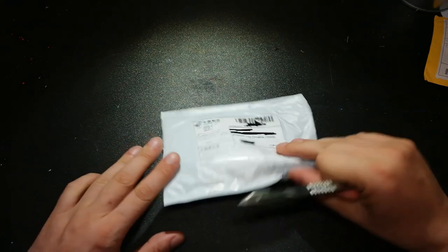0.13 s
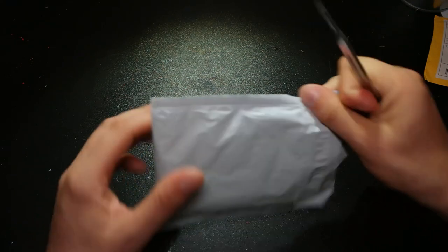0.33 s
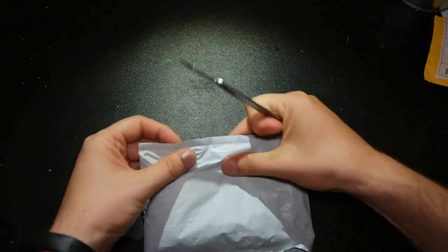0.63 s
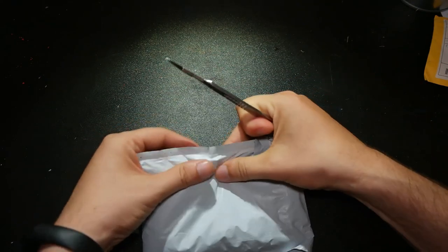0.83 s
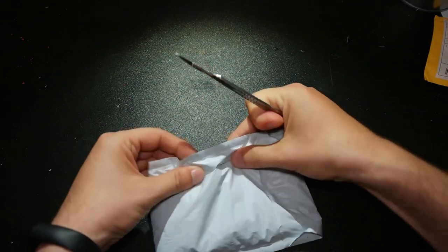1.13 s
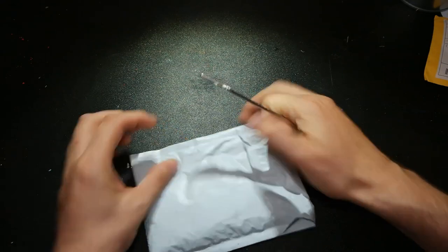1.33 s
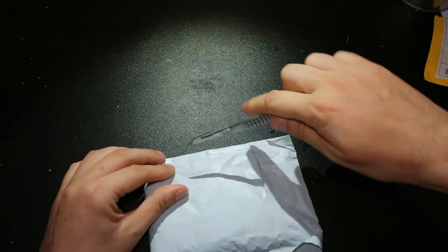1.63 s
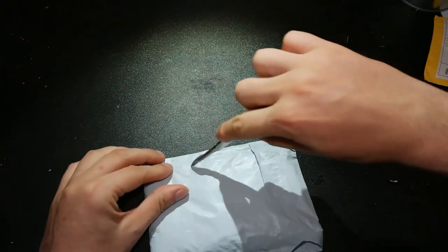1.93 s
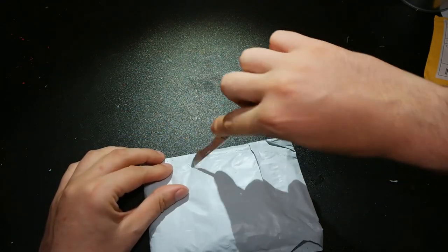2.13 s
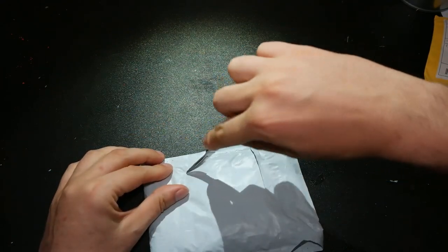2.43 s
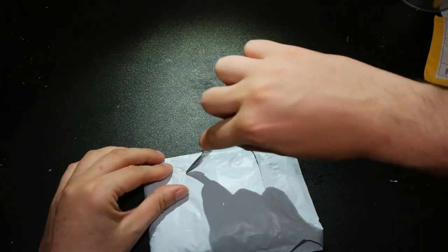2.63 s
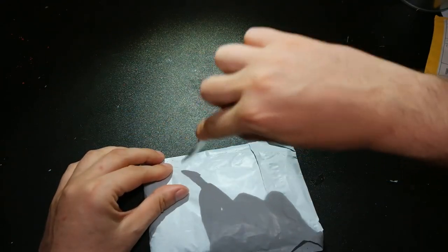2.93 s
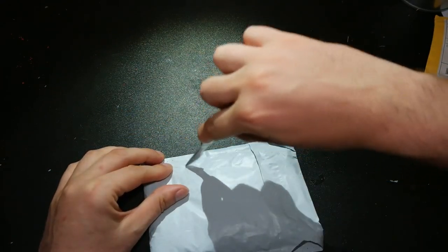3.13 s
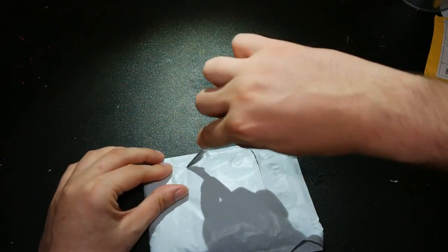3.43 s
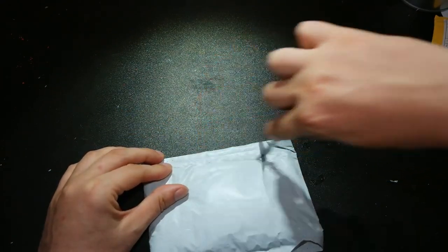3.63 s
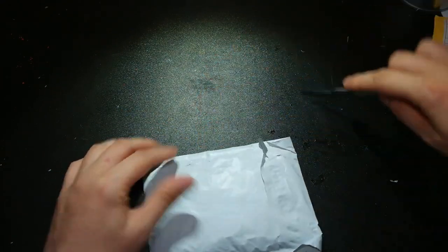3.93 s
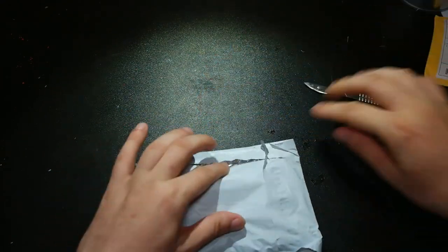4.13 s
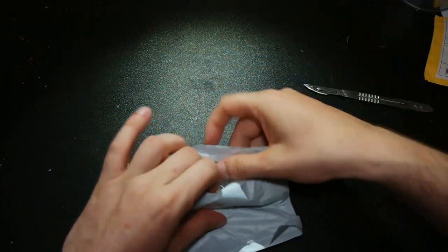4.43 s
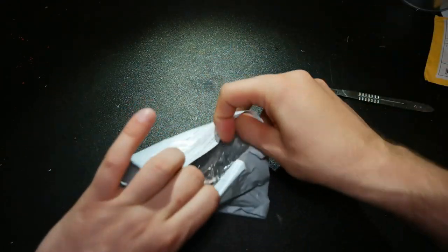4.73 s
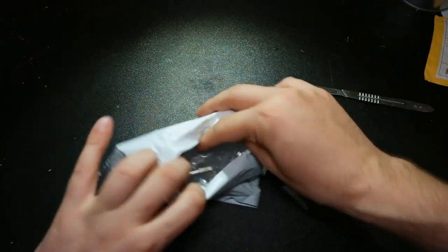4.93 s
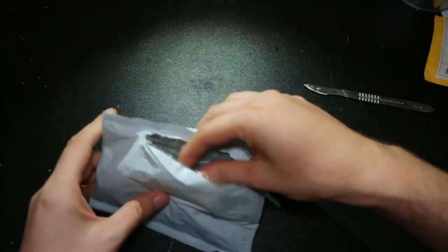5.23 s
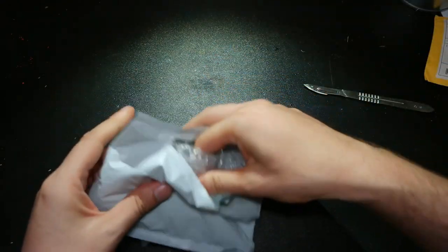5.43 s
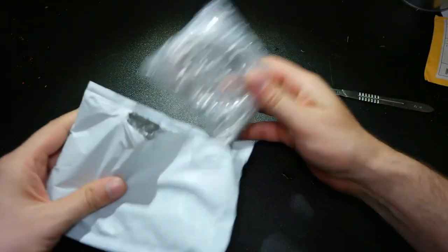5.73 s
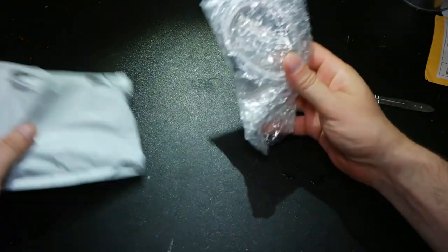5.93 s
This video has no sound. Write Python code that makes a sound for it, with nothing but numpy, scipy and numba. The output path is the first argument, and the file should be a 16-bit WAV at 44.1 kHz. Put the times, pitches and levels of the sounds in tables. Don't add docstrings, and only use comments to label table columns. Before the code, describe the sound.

Close, bright crinkling of a plastic mailer, a quiet pause of small cutting clicks, a steel blade dropped on the desk, then tearing and more crinkling.

```python
import sys
import numpy as np
from scipy import signal
from scipy.fft import rfft, irfft, next_fast_len
from scipy.io import wavfile
from scipy.ndimage import map_coordinates
from numba import njit

SR = 44100
rng = np.random.default_rng(int(sys.argv[2]) if len(sys.argv) > 2 else 0)


def makeup_ratio(level_db):
    decades = np.asarray(level_db, float) / 20
    return 10 ** decades


def to_wav(sig):
    pcm = np.clip(np.atleast_2d(sig), -1, 1) * 32767
    pcm = np.round(pcm).astype(np.int16)
    wavfile.write(sys.argv[1], SR, pcm.T)


N = 267907

# (start [s], hold [s], film level [dB], weight on bag and desk re film [dB], air pocket pitch [Hz])
HAND_MOVES = [(0.045, 0.087, -28.5, -8.5, 1550), (0.171, 0.054, -22.5, -10.5, 1390),
              (0.325, 0.046, -34, -13.5, 1750), (0.429, 0.022, -31, -15, 1590),
              (0.5, 0.0097, -23.5, -7, 1170), (0.582, 0.02, -29.5, 1, 1070),
              (0.625, 0.05, -27, -8, 1270), (0.728, 0.0078, -22, -13.5, 1050),
              (0.807, 0.048, -32.5, -5, 1070), (0.918, 0.069, -20.5, -14, 1140),
              (0.997, 0.056, -26, 0.5, 1050), (1.121, 0.086, -22.5, -12.5, 1310),
              (1.303, 0.017, -19.5, -9, 1320), (1.362, 0.05, -30.5, -9, 1100),
              (1.55, 0.05, -42.5, -7.5, 1400),
              (1.98, 0.016, -55.5, -4, 1300), (2.041, 0.018, -59, -12, 1410),
                 (2.199, 0.011, -57, -12, 1000), (2.471, 0.037, -51, -4, 1730),
                 (2.745, 0.018, -54, -25, 2200), (2.785, 0.082, -55, -25, 1920),
                 (2.974, 0.0086, -36, -11, 1930), (3.19, 0.0086, -54, 8.5, 1360),
                 (3.3, 0.018, -88, 10, 633), (3.492, .04, -45.5, -38, 1300),
                 (3.541, 0.053, -24, -8.5, 1050), (3.6, 0.1, -20.5, -5, 1400),
                 (3.74, 0.029, -27, -11.5, 1160), (3.898, 0.063, -36.5, -6, 770),
                 (3.995, 0.033, -45, 25.5, 660), (4.08, 0.066, -36, 10, 935),
                 (4.149, 0.083, -35.5, 13, 773),
              (4.286, 0.0083, -30, -8, 1130), (4.371, 0.016, -24, -8, 950),
                   (4.463, 0.035, -31, -5, 1240), (4.574, 0.022, -18, -9, 1300),
                   (4.655, 0.042, -23.5, -13.5, 1510), (4.734, 0.071, -25, -15.5, 1300),
                   (4.899, 0.0068, -40, -9, 1080), (4.996, 0.072, -24.5, -7.5, 1200),
                   (5.256, 0.063, -25.5, -11.5, 1600), (5.33, .03, -42, -7, 1050),
                   (5.365, 0.1, -34.5, -24, 1780), (5.468, 0.089, -32.5, -18, 2150),
                   (5.603, 0.11, -25.5, -16.5, 1570), (5.719, 0.073, -32, -7.5, 890)]
# (time [s], level [dB])
FILM_CREEP = [(0, -35.5), (.12, -39.5), (1.4, -54), (1.52, -48), (1.82, -60), (2.4, -70.5), (3.45, -68),
              (3.9, -60.5), (4.3, -39), (4.6, -26.5), (5.1, -34), (5.16, -38.5), (5.75, -38), (5.93, -40.5),
              (6.07, -41.5)]
FILM_BANDS = [140, 700, 3600, 11500]
# (start [s], length [s], level [dB], first pitch [Hz], last pitch [Hz])
SINGING_PANELS = [(0.012, 0.041, -32.5, 1570, 1512), (2.358, 0.00297, -56, 2060, 2000),
                  (2.467, .012, -45, 2000, 2000), (0.17, 0.012, -31.5, 1380, 1460),
                  (0.492, .022, -37.5, 1000, 1013), (0.658, .02, -40.5, 1206, 1246),
                  (0.934, 0.031, -28.5, 1033, 1013), (1.024, 0.031, -34.5, 1006, 1030),
                  (1.349, .035, -30.5, 1155, 1140), (3.59, 0.028, -28, 1113, 1740),
                  (3.64, 0.015, -28.5, 1340, 1300), (3.649, 0.017, -31, 1300, 1830),
                  (3.68, .02, -36.5, 1270, 1130), (4.911, 0.004, -32.5, 1050, 1010),
                  (4.584, 0.039, -29, 1430, 2000), (4.771, 0.024, -36, 1060, 1125),
                  (5.33, 0.09, -42, 1050, 1030), (5.346, .035, -32, 2450, 1590),
                  (5.465, 0.092, -34.5, 2140, 2220), (5.506, .04, -32.5, 3880, 3840),
                  (5.613, 0.062, -35.5, 1570, 1540), (5.749, 0.054, -41.5, 800, 815)]
# (time [s], peak level [dB], fine creases re peak
# [dB], flap pitch [Hz])
FOLD_SNAPS = [(0.157, -21, -16, 4750), (0.177, -7.5, -12.5, 1370), (0.2333, -17.5, -1.5, 1010),
              (0.2529, -8.5, -14, 3350), (0.3431, -17.5, -2.5, 1860), (0.367, -17.5, -11.5, 1860),
              (0.4372, -16, -17.5, 1760), (0.4998, -17, -1, 1070), (0.511, -17, 6, 1020),
              (0.601, -15.5, -26.5, 4700), (0.651, -16, -11, 1430), (0.7199, -17, 7.5, 3020),
              (0.733, -15.5, -4, 7160), (0.7495, -17, -2.5, 940), (0.832, -24.5, 8, 4030),
              (0.914, -22.5, 6, 6440), (0.9386, -16, 3, 1070), (0.969, -22, -5, 3770),
              (0.999, -22, 8, 6750), (1.0282, -8, -28, 850), (1.1085, -18, -11, 2760),
              (1.127, -16, -2, 3120), (1.137, -20.5, 6, 5000), (1.146, -19.5, 13, 4530),
              (1.182, -20, -3, 4770), (1.2995, -25.5, 10, 3060), (1.4013, -26, -10, 3480),
              (1.4322, -20, -4, 1487), (1.477, -32, 3, 5600),
              (1.5913, -24, -10.5, 1390), (1.7014, -34, -2, 5430), (1.7828, -43.5, -19, 2480),
                 (1.984, -59.5, 17, 5060), (2.0506, -40, -3, 3670), (2.3578, -37.5, -26, 2070),
                 (2.4667, -30.5, -1, 3100), (2.505, -35, -3, 2750), (2.776, -22, -0.5, 4940),
                 (2.809, -24, -7.5, 1960), (2.83, -21, -8.5, 3960), (2.953, -35, -30.5, 4760),
                 (2.9699, -17.5, 5.5, 2060), (2.9722, -9.5, 1, 1980), (2.9799, -38, 4, 3830),
                 (3.193, -28, -23, 1940), (3.2068, -38, 7.5, 3000), (3.303, -48, -27, 1005),
                 (3.479, -30, -9, 3440), (3.488, -33, 7, 2430), (3.528, -32, 9, 3300),
                 (3.561, -26, 5, 3920), (3.589, -23, -7, 1070), (3.6247, -7, -1, 6570),
                 (3.7372, -9.5, -1, 1100), (3.792, -15.5, 3.5, 1580), (3.911, -17.5, 3, 2420),
                 (3.9916, -10.5, -3.5, 1030), (4.0752, -4.5, -12, 750), (4.1468, -20, -22, 796),
                 (4.228, -33, 22.5, 977),
              (4.3003, -21.5, 9.5, 5100), (4.365, -20.5, -1, 1080), (4.4585, -25, -3, 1020),
                   (4.4798, -19.5, -0.5, 1640), (4.5208, -18.5, -1.5, 5030), (4.572, -8, -24, 1360),
                   (4.657, -23, 3.5, 3200), (4.6695, -15.5, -20, 4100), (4.7297, -32, -17, 3770),
                   (4.756, -37, 5, 6200), (4.796, -13.5, -27, 4300), (4.854, -31, 11, 5800),
                   (4.9091, -11, -4.5, 1070), (5.009, -31, 15.5, 4770), (5.0452, -18, 5, 3350),
                   (5.0721, -14.5, 7.5, 3250), (5.1925, -25.5, -2, 5000), (5.2738, -20, 15, 4780),
                   (5.291, -18, 5.5, 3720), (5.34, -21, 1, 1100), (5.3651, -19, -41, 1820),
                   (5.422, -18.5, 7.5, 6000), (5.4708, -25, 3, 2180), (5.556, -17, -30, 7200),
                   (5.5918, -20.5, -27, 1590), (5.6259, -21, 8, 4840), (5.7206, -18.5, -3.5, 3430),
                   (5.8546, -34, 1.5, 3980), (5.9618, -32, -15, 6530)]
# (time [s], peak level [dB],
# strongest pitch [Hz])
CREASE_TICKS = [(0.0174, -25, 1564), (0.2541, -7.5, 2170), (1.2876, -22, 7200), (1.3086, -7, 5710),
                (0.0648, -27.5, 3000), (0.094, -17, 3000), (0.1176, -21.5, 3220), (0.158, -25, 4750),
                (0.1774, -14.5, 3980), (0.1885, -13, 3130), (0.2334, -19, 13840), (0.2549, -3, 3830),
                (0.3167, -30, 2250), (0.341, -23.5, 11600), (0.366, -29.5, 2210), (0.442, -15.5, 3220),
                (0.4873, -17, 1900), (0.498, -14, 11800), (0.518, -10, 4690), (0.538, -14, 3140),
                (0.5975, -15.5, 3210), (0.617, -13.5, 4570), (0.6475, -23.5, 3210), (0.7063, -16.5, 2960),
                (0.7197, -10.5, 12500), (0.733, -16.5, 7220), (0.7505, -5.5, 7150), (0.833, -21, 8700),
                (0.8534, -22.5, 4900), (0.9009, -22.5, 3140), (0.9138, -24, 6360), (0.92, -12.5, 14000),
                (0.94, -13.5, 12300), (0.9493, -11, 3890), (0.97, -12, 3900), (0.9857, -9.5, 13140),
                (0.998, -16.5, 8930), (1.0325, -17, 2990), (1.107, -15.5, 2740), (1.1297, -9.5, 4590),
                (1.134, -8, 12800), (1.145, -3, 13900), (1.156, -6.5, 11880), (1.1844, -5.5, 4720),
                (1.2989, -30.5, 1830), (1.2987, -6, 13300), (1.4032, -24, 3480), (1.429, -25, 3950),
                (1.485, -33, 5510), (1.5459, -37, 2500), (1.558, -35, 5820), (1.5744, -28, 3110),
                 (1.5913, -33, 5280), (1.7005, -25, 4980), (2.359, -37.5, 2030), (2.4665, -32, 3100),
                 (2.4755, -26, 2000), (3.488, -24, 5970), (3.739, -14.5, 5000), (4.0755, -3, 1900),
                 (2.7743, -24.5, 4800), (2.972, -3.5, 8900), (3.5139, -25.5, 13000), (3.5414, -24.5, 3280),
                 (3.5916, -13, 2040), (3.6064, -18.5, 2050), (3.6246, -12, 6450), (3.6407, -14, 2030),
                 (3.6546, -9.5, 3900), (3.6669, -15.5, 1910), (3.6809, -8.5, 4870), (3.6968, -1, 6020),
                 (3.7084, -12.5, 5500), (3.7664, -28, 2940), (3.9579, -30, 11100), (4.2298, -12, 11600),
                (4.3019, -16, 11700), (4.3688, -15.5, 10600), (4.3808, -4, 12200), (4.4563, -32, 3070),
                   (4.4764, -17.5, 13900), (4.5172, -8, 4840), (4.5725, -18.5, 3320), (4.595, -3.5, 10700),
                   (4.611, -2.5, 1800), (4.654, -22, 3280), (4.6664, -5, 3950), (4.6857, -16, 2920),
                   (4.7184, -16.5, 6430), (4.7325, -16, 3980), (4.7548, -20, 11000), (4.7763, -5.5, 14000),
                   (4.7962, -13, 4680), (4.832, -32, 5050), (4.8545, -7, 13600), (4.9109, -4, 7140),
                   (4.9593, -28, 4150), (5.007, -15.5, 10900), (5.0463, -17, 3690), (5.0704, -13.5, 3300),
                   (5.1925, -35.5, 4500), (5.224, -17.5, 3900), (5.2734, -15.5, 10700),
                   (5.2904, -10.5, 13100), (5.3385, -23.5, 5720), (5.3724, -27, 1800), (5.3984, -20, 12100),
                   (5.4198, -15.5, 10800), (5.469, -17, 12800), (5.546, -18, 3900), (5.5643, -9.5, 12000),
                   (5.596, -20.5, 12400), (5.625, -6.5, 11700), (5.672, -13.5, 4900), (5.7181, -31, 3440),
                   (5.8446, -28, 3810)]
# (time [s], desk blow [dB], steel ring re blow [dB], push length [ms])
BLADE_DROPS = [(2.9705, -50.5, 42, 2.1), (3.988, -12.5, -1, 2.1), (4.02, -19, -10, 1.5),
               (4.074, -13.5, -26, 0.14), (4.083, -26, 25, 0.18), (4.084, -54, -5, 0.36),
               (4.146, -63, -22, 0.4), (4.148, -24, 6, 0.23), (4.159, -37, 27.5, .5),
               (4.169, -40, 28, 0.67), (4.199, -30.5, -1, 1.3), (4.226, -45.5, 18, 1.1)]
# (time [s], blow level [dB], push length [ms])
HAND_BUMPS = [(0.018, -21, 15), (0.574, -16.5, 5.8), (0.597, -25.5, 7), (1.132, -33, 9.2), (1.29, -40, 3.5),
              (2.272, -67, 0.75), (2.508, -30, 19), (2.572, -32.5, 23), (2.62, -39, 19), (3.214, -31, 6.8),
              (3.227, -42, 4.6), (3.297, -40.5, 3.8), (3.33, -52.5, 3.2), (3.49, -35, 10.4),
              (3.571, -30, 3.8), (3.619, -23, 6.6), (3.678, -21, 5.7), (3.745, -24, 9.6),
              (4.365, -25.5, 6.2), (4.79, -42.5, 0.58)]
# (pitch [Hz], level [dB], ring time to -60 dB [s])
DESK_MODES = [(73.6, -6.5, 0.066), (117, -5, 0.044), (230, -5, 0.072), (292, -2, 0.096),
              (449.4, 6.5, 0.055), (607, 5, 0.055), (685, 3, 0.039), (832, 3, 0.056), (947, 10, 0.019),
              (1390, 7, 0.04), (1635, 3.5, 0.033), (2000, 1.5, 0.035), (2440, -0.5, 0.02)]
STEEL_MODES = [(3920, -22, .03), (6220, -27, .05), (6900, -24, .04), (9313, -26, .06), (10570, -8, .018),
               (10520, -25, .08), (12130, -14, .03), (13090, -18, .03), (13400, -6, .03), (13700, -6, .045),
               (14010, -6, .03), (14640, -7, .04), (15320, -11, .02)]
# (frequency [Hz], level per Hz [dB])
HISS_COLOUR = [(18, -38), (30, -0.5), (181, -4.5), (562, 2), (641, -8.5), (1340, -11.5), (4180, -20.5),
               (13700, -33.5), (15200, -22.5), (16500, -37)]
# (frequency [Hz], level [dB])
PORT_COLOUR = [(40, -5), (150, 2.5), (500, 3), (1100, 7), (2400, 2.5), (4000, 5), (7500, 6.5),
               (11000, 10.5), (13700, 15), (15500, 13)]

PLACES = 7


def film(small_hz=308.0):
    fine = creases(count=8000, parts=5, low_hz=226.0, top_hz=16100.0, cycles=5.95,
                   patchy_db=3.0, trim_db=-11.0, wide_db=29.0)
    no_bass = signal.butter(3, small_hz, "high", fs=SR, output="sos")
    return signal.sosfilt(no_bass, fine + pocket() + panels() + snaps())


def handling(rise_db_s=592, fall_db_s=232, creep_weight_db=-13.5, creep_pocket_hz=1300,
             lift_s=4.83, lifted_db=-19):
    t = np.arange(0, N / SR + .01, .004)
    moves_table = HAND_MOVES
    start, hold, db, weight, hz = np.transpose(moves_table)[:, :, None]
    rising = rise_db_s * np.maximum(start - t, 0)
    falling = fall_db_s * np.maximum(t - start - hold, 0)
    moves = makeup_ratio(2 * (db - rising - falling))
    creep = makeup_ratio(2 * np.interp(t, *np.transpose(FILM_CREEP)))
    power = moves.sum(axis=0) + creep

    def share(of_move, of_creep):
        return ((moves * of_move).sum(axis=0) + creep * of_creep) / power

    film_db = 10 * np.log10(power)
    weight_db = share(weight, creep_weight_db)
    rumble_db = film_db - 18.5 + lifted_db * (t > lift_s) + 1.2 * weight_db
    fine_db = film_db - 8 + 0.11 * (film_db + 39.0) - 0.12 * weight_db
    return t, rumble_db, film_db + weight_db, film_db, fine_db, share(hz, creep_pocket_hz)


def creases(count, parts, low_hz, top_hz, cycles, patchy_db, trim_db, wide_db):
    u = rng.random((count, 4 + 2 * parts))
    s = u[:, :1] * N / SR + .0006 * u[:, 4 + parts:]
    hz = low_hz * (top_hz / low_hz) ** ((np.arange(parts) + u[:, 4:4 + parts]) / parts)
    times, *bands, _ = handling()
    db = by_pitch(hz, np.array([np.interp(s, times, b) for b in bands]))
    jerks = map_coordinates(rng.standard_normal((400, 24)), [s * 60, 3 * np.log2(hz / low_hz)], order=1)
    size_db = -4.3 * np.log(u[:, 1:2] + .015) + patchy_db * jerks
    db = db + size_db + 10 * np.log10(hz / 1000) + trim_db
    pan_db = 1.0 + wide_db * (u[:, 2:3] - .5)
    return grains(s, hz, cycles / hz, db, pan_db, 7 * (u[:, 3:4] - .5))


def pocket(count=2500, cycles=34.0, spread=0.045, trim_db=-22.0):
    u = rng.random((count, 2))
    s = u[:, 0] * N / SR
    times, _, pocket_db, _, _, pocket_hz = handling()
    hz = np.interp(s, times, pocket_hz) * (1 + spread * rng.standard_normal(count))
    db = np.interp(s, times, pocket_db) - 0.77 * np.log(u[:, 1] + .002) + trim_db
    return grains(s, hz, cycles / hz, db, 0.86, 0)


def panels(count=24, cycles=27.0, spread=0.019, trim_db=-8.5):
    start, length, db, first_hz, last_hz = np.transpose(SINGING_PANELS)[:, :, None]
    u = rng.random((len(start), 3, count))
    hz = first_hz + (last_hz - first_hz) * u[:, 0]
    hz = hz * (1 + 2 * spread * (u[:, 1] - .5))
    db = db - 1.1 * np.log(u[:, 2] + 0.0081) + trim_db
    return grains(start + length * u[:, 0], hz, cycles / hz, db, 0.83, 0)


def snaps(parts=32, cycles=5.07, run_s=0.0031, trim_db=-2.0, tilt_db=1.5, flap_db=0.0,
          flap_oct=0.24, flap_cycles=12.4, small_flap_hz=1900, thin_hz=950.0):
    snaps_table = FOLD_SNAPS
    s, peak, fine, flap_hz = np.transpose(snaps_table)[:, :, None]
    pocket_db = -26.5 - 8.5 * np.log2(flap_hz / 2500)
    u = rng.random((len(s), 4, parts))
    hz = 250 * (16000 / 250) ** ((np.arange(parts) + u[:, 0]) / parts)
    late = u[:, 1] ** 5
    flap = np.exp(-(np.log2(hz / flap_hz) / flap_oct) ** 2)
    bands = np.array([peak + pocket_db - 18, peak + pocket_db, peak, peak + fine])
    db = by_pitch(hz, bands + 0 * hz)
    db = db - 9 * late + tilt_db * np.log2(hz / 3600) + flap_db * flap + trim_db
    t60 = (cycles + flap_cycles * flap) / hz
    pan_db, lag = 2.0 + 5 * (u[:, 3, :1] - .5), 4 * (u[:, 2, :1] - .5)
    table = s + 0.00082 + run_s * late, hz, t60, db, pan_db, lag
    small = flap_hz[:, 0] > small_flap_hz
    thin = signal.butter(3, thin_hz, "high", fs=SR, output="sos")
    big_flaps = grains(*(a[~small] for a in table))
    return big_flaps + signal.sosfilt(thin, grains(*(a[small] for a in table)))


def ticks(parts=10, low_hz=1470.0, fall_db_oct=12.0, cycles=3.5, trim_db=-4.0):
    ticks_table = CREASE_TICKS
    s, peak, top_hz = np.transpose(ticks_table)[:, :, None]
    u = rng.random((len(s), 3, parts))
    hz = low_hz * (16000 / low_hz) ** ((np.arange(parts) + u[:, 0]) / parts)
    db = peak - fall_db_oct * abs(np.log2(hz / top_hz)) + trim_db
    pan_db, lag = 1 + 9 * (u[:, 1, :1] - .5), 3 * (u[:, 2, :1] - .5)
    clicks = grains(s + 0.00098, hz, cycles / hz, db, pan_db, lag)
    return signal.sosfilt(signal.butter(2, low_hz, "high", fs=SR, output="sos"), clicks)


def rumble():
    return creases(count=900, parts=1, low_hz=35., top_hz=332.0, cycles=6.0,
                   patchy_db=4.0, trim_db=2.0, wide_db=27.0)


def blade():
    s, blow, steel, push_ms = np.transpose(BLADE_DROPS)[:, :, None]
    desk = strike(DESK_MODES, s + 0.00127, blow - 11.0, push_ms, 0.0007, 0.043, touches=2)
    return desk + strike(STEEL_MODES, s + 0.0003, blow + steel - 21, 0, 0.005, 0.008, touches=3)


def bumps():
    s, blow, push_ms = np.transpose(HAND_BUMPS)[:, :, None]
    return strike(DESK_MODES, s, blow - 6.0, push_ms, 0.0025, 0.093, touches=1)


def strike(modes, s, db, push_ms, spread_s, detune, touches):
    hz, mode_db, t60 = np.tile(np.transpose(modes), touches)
    u = rng.standard_normal((len(s), 3, len(hz)))
    level = db + mode_db + 3 * u[:, 0] - 10 * np.log10(1 + (push_ms * hz / 1000) ** 4)
    return grains(s + spread_s * abs(u[:, 1]), hz * (1 + detune * u[:, 2]), t60, level, .5, -1.7)


def by_pitch(hz, band_db):
    place = np.interp(np.log(hz), np.log(FILM_BANDS), np.arange(4))
    low = np.minimum(place.astype(int), 2)
    low_db, high_db = (np.take_along_axis(band_db, k[None], axis=0)[0] for k in (low, low + 1))
    return low_db + (place - low) * (high_db - low_db)


def grains(s, hz, t60, db, pan_db, lag):
    columns = np.broadcast_arrays(s, hz, t60, db, pan_db, lag)
    s, hz, t60, db, pan_db, lag = (np.ravel(a) * 1. for a in columns)
    left, right = makeup_ratio(db + pan_db / 2), makeup_ratio(db - pan_db / 2)
    start = (s * SR).astype(np.int64)
    return ring(N, PLACES, start, np.minimum(hz, .45 * SR), t60, left, right, lag.astype(np.int64))


@njit
def ring(count, places, start, hz, t60, left, right, lag):
    out = np.zeros((places, 2, count + 64))
    for g in range(len(start)):
        rate = np.log(1000) / (t60[g] * SR)
        turn = np.exp(2j * np.pi * hz[g] / SR - rate)
        rise = np.exp(-hz[g] / SR)
        z, r, i = 1 + 0j, rise, max(start[g], 16)
        for n in range(min(int(t60[g] * SR) + 2, count - i)):
            swing = z.real * (1 - r)
            out[g % places, 0, i + n] += left[g] * swing
            out[g % places, 1, i + n + lag[g]] += right[g] * swing
            z, r = z * turn, r * rise
    return out[:, :, :count]


def room(dry, near_db=3.0, near_t60=0.025, wall_db=-2.5, wall_t60=0.19, wall_top_hz=12000.0,
         apart_hz=3000., small_hz=660.0):
    t = np.arange(SR // 2) / SR
    mid, side, far_mid, far_side = rng.standard_normal((4, PLACES, 1, len(t)))
    apart = signal.butter(1, apart_hz, "high", fs=SR)
    sign = np.array([[1], [-1]])

    def tail(m, d, t60):
        both = m + sign * signal.lfilter(*apart, d)
        return both * makeup_ratio(-60 * t / t60) * np.sqrt(7 / t60 / SR)

    near = signal.lfilter(*signal.butter(1, small_hz, "high", fs=SR), tail(mid, side, near_t60))
    near = near * np.minimum(t / 0.0013, 1)
    walls = signal.lfilter(*signal.butter(1, wall_top_hz, fs=SR), tail(far_mid, far_side, wall_t60))
    walls = walls * np.minimum(t / 0.0042, 1)
    size = next_fast_len(N + len(t))
    response = rfft(makeup_ratio(near_db) * near + makeup_ratio(wall_db) * walls, size)
    echoes = rfft(dry.mean(axis=1)[:, None], size) * response
    return dry.sum(axis=0) + irfft(echoes.sum(axis=0), size)[:, :N]


def room_tone(level_db=-78.5, apart_hz=900., self_noise=.3):
    mid, side = shape(rng.standard_normal((2, N)), HISS_COLOUR)
    side = self_noise * side + signal.lfilter(*signal.butter(1, apart_hz, "high", fs=SR), side)
    return makeup_ratio(level_db) * np.array([mid + side, mid - side]) / np.std(mid)


def shape(x, points):
    hz, db = np.transpose(points)
    bins = np.maximum(np.arange(x.shape[-1] // 2 + 1) * SR / x.shape[-1], 1)
    return irfft(rfft(x) * makeup_ratio(np.interp(np.log(bins), np.log(hz), db)), x.shape[-1])


def scene(tick_echo_db=-7.0):
    cracks = ticks()
    on_desk = film() + rumble() + blade() + bumps()
    return room(on_desk + makeup_ratio(tick_echo_db) * cracks) + cracks.sum(axis=0) + room_tone()


def top_cut(x):
    return signal.sosfilt(signal.butter(12, 16810, fs=SR, output="sos"), x)


def record(dry):
    cut = signal.ellip(8, .2, 25, 15900, fs=SR, output="sos")
    rounded = .75 * np.tanh(shape(dry, PORT_COLOUR) / .75)
    return top_cut(signal.sosfilt(cut, rounded))


dry = scene()
out = record(dry)
to_wav(out)
```